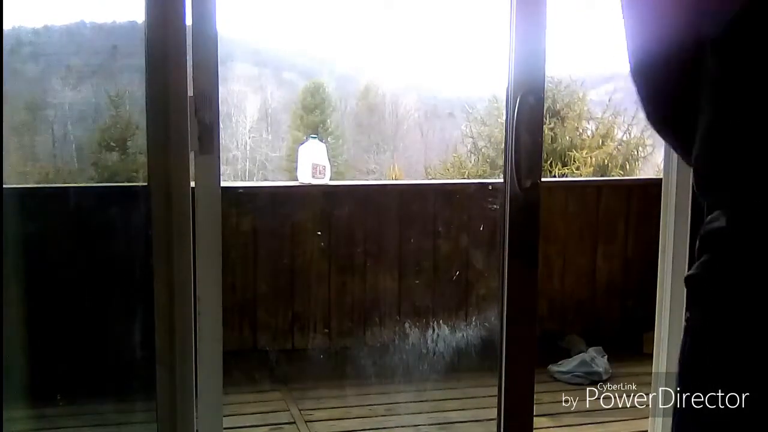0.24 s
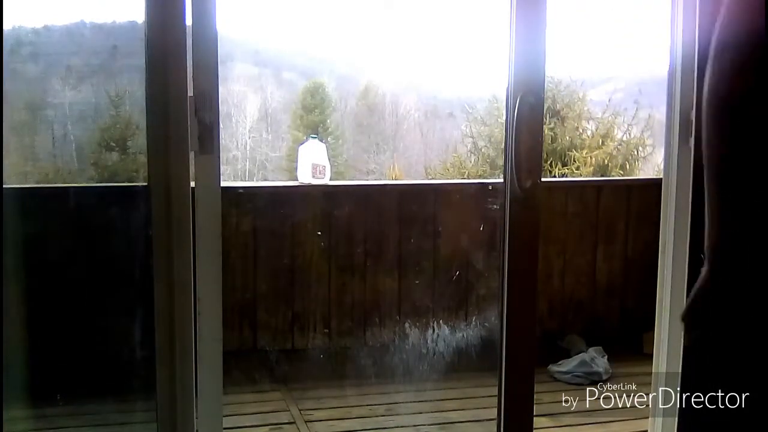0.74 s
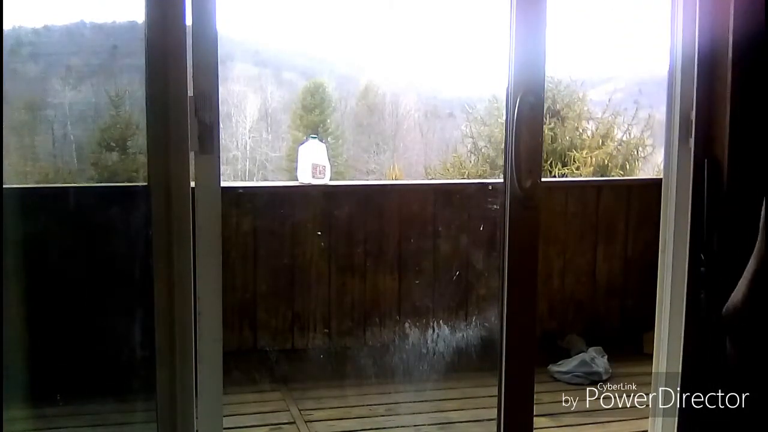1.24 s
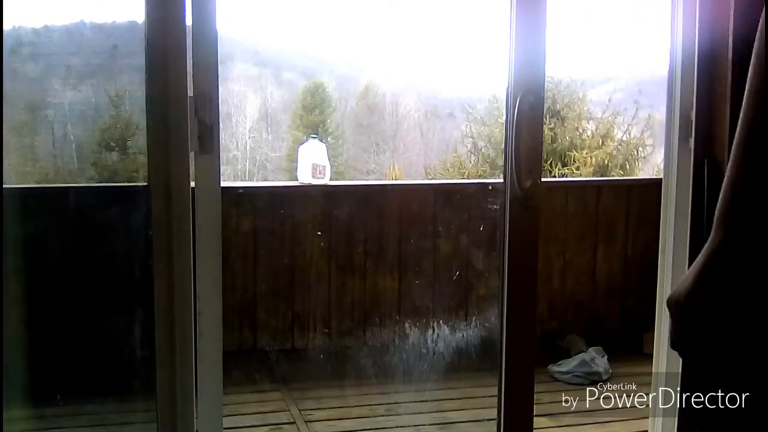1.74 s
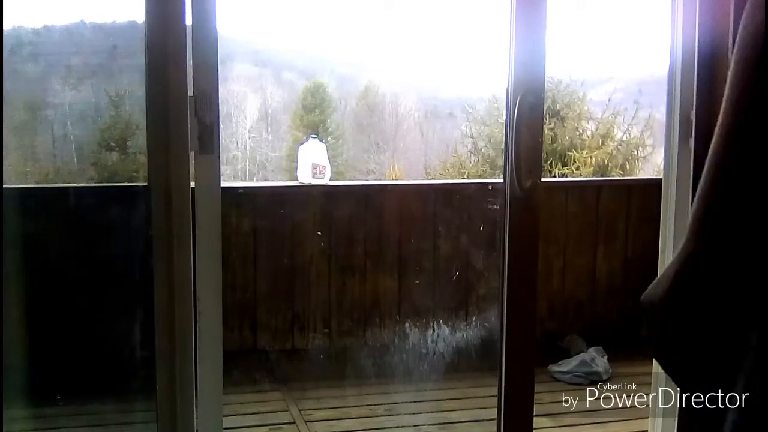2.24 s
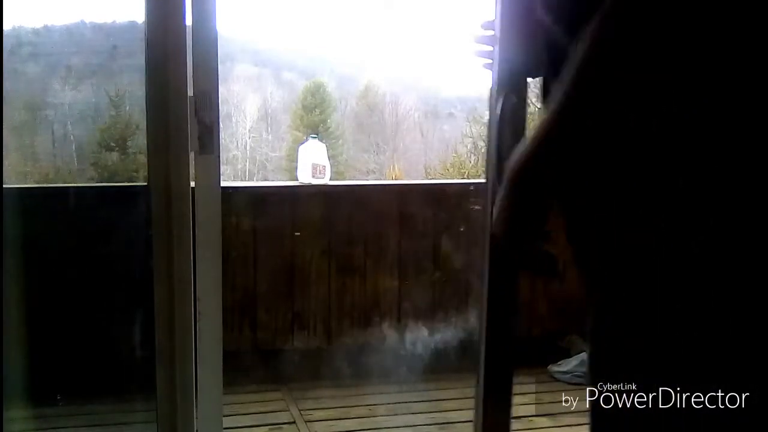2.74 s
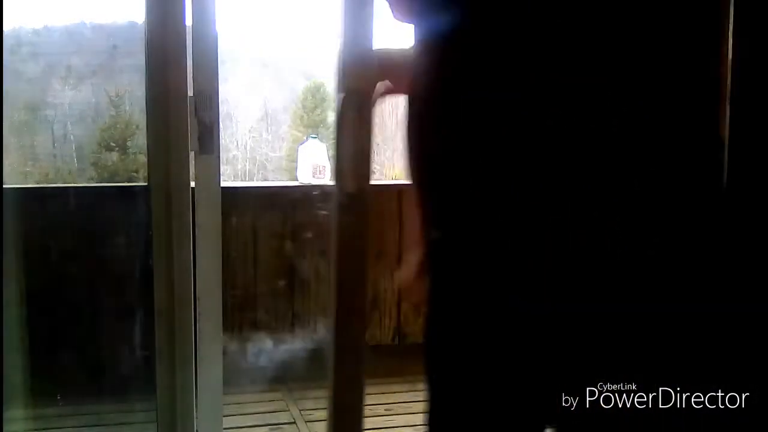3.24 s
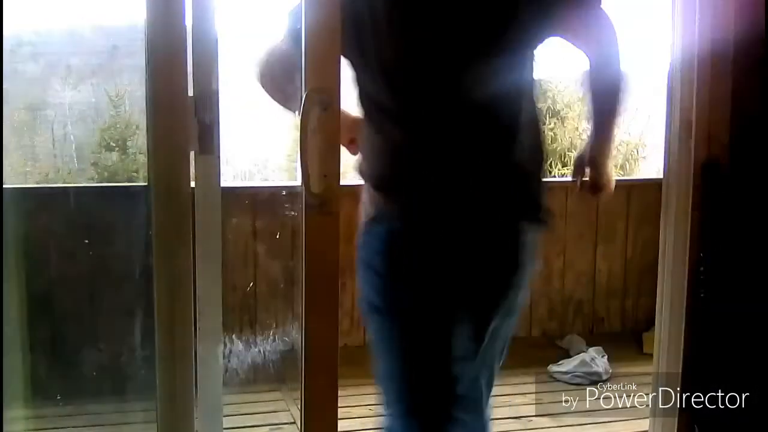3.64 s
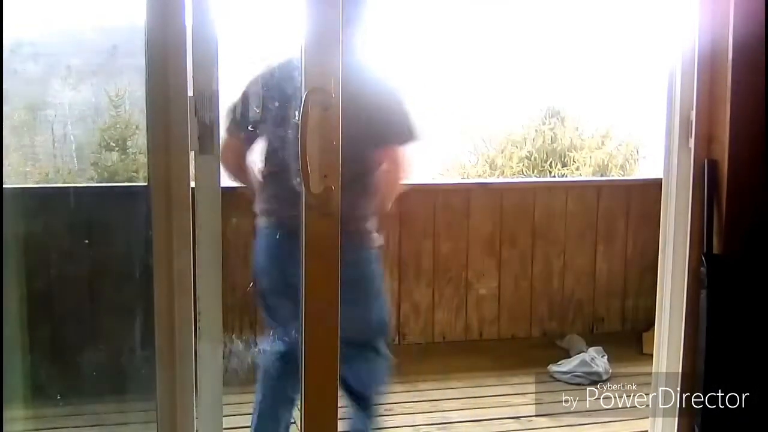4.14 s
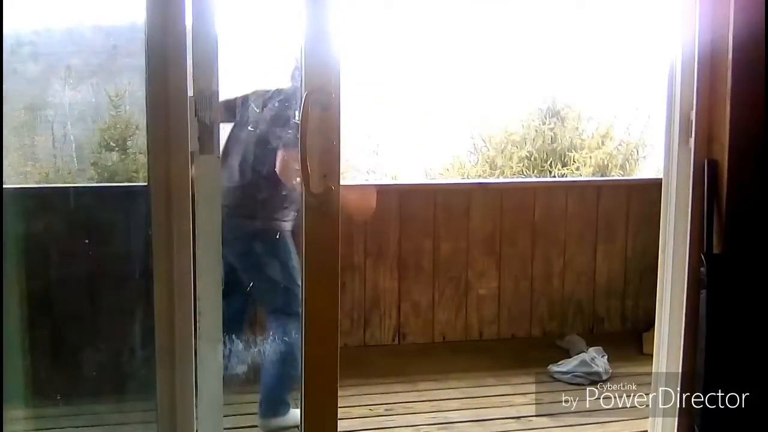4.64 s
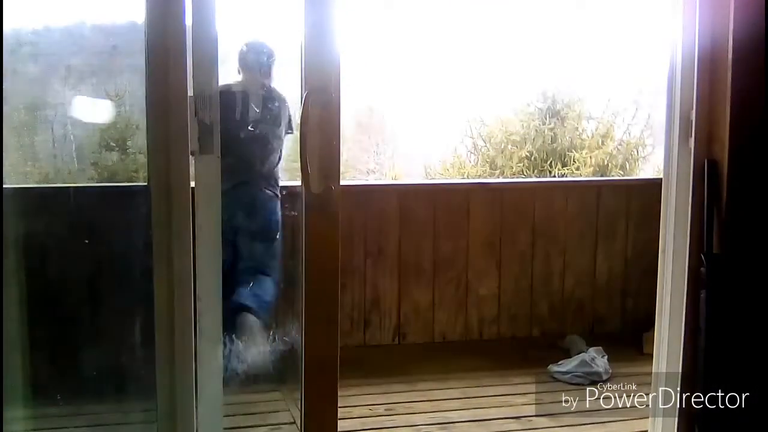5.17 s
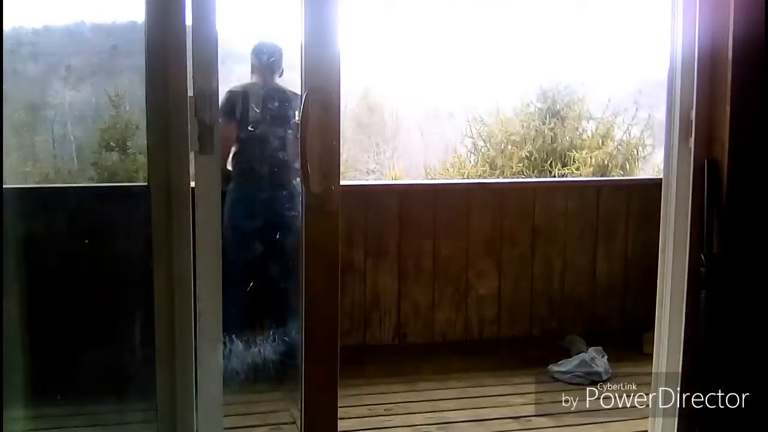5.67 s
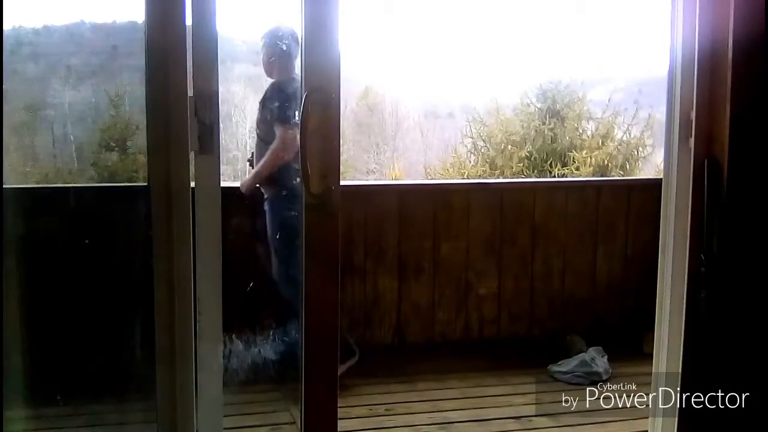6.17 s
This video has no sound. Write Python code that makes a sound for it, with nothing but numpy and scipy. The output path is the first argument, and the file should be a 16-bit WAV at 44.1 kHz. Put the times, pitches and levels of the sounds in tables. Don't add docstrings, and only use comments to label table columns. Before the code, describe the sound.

A quiet, moderately reverberant room has low air noise, a faint hum, thin high whine and hiss. A wall clock ticks softly about once a second throughout. Soles scuff a wooden floor at 0.1 s and again, longer, at 0.6 to 0.9 s; a single dull heel thump lands at 1.4 s. From 2.36 to 2.58 s a handle slips in a string of small dry clicks. At 2.75 s a latch snaps sharply with a woody frame thud, and a sliding door rumbles on gritty rollers, strongest from 3.0 to 3.3 s, fading by 3.75 s. Steps land on hollow deck boards at 3.88, 4.22, 4.49 and softly at 4.8 s, with cloth rustle, tiny metallic pings and low boom. At 5.14 s one very loud, hard knock with fast rebounds rings a glass pane, rasping the close indoor microphone. It decays under a second, leaving faint board movement and a tick at 6.06 s.

```python
import sys
import numpy as np
from scipy import signal
from scipy.fft import rfft, irfft
from scipy.io import wavfile
from scipy.ndimage import uniform_filter1d

SR = 44100
rng = np.random.default_rng(int(sys.argv[2]) if len(sys.argv) > 2 else 0)


def inscribe(sig):
    pcm = np.round(np.clip(np.atleast_2d(sig).T, -1, 1) * 32767)
    wavfile.write(sys.argv[1], SR, pcm.astype(np.int16))


def undo_db(level):
    steps = np.asarray(level, float) / 20
    return 10 ** steps


N = 282703


def evened(x):
    return x / np.sqrt(np.mean(x ** 2) + 1e-20)


def read(points, hz):
    f, value = np.transpose(points)
    return np.interp(np.log(hz + 1), np.log(f + 1), value)


def highpass(x, order, cutoff_hz):
    return signal.sosfilt(signal.butter(order, cutoff_hz, "high", fs=SR, output="sos"), x)


def colour(x, points, size=4096, even=True):
    gain_db = read(points, abs(np.fft.fftfreq(size, 1 / SR)))
    log_gain = np.log(undo_db(np.maximum(gain_db, -140)))
    taps = np.fft.ifft(np.exp(np.conj(signal.hilbert(log_gain)))).real[:size // 2]
    return signal.oaconvolve(x, taps / np.linalg.norm(taps) ** even)[:len(x)]


def resonate(x, hz, width_hz):
    r = np.exp(-np.pi * width_hz / SR)
    return 2 * signal.lfilter([1 - r], [1, -r * np.exp(2j * np.pi * hz / SR)], x).real


def ring(x, modes):
    t = np.arange(SR // 2) / SR
    response = sum(undo_db(db - 60 * t / t60) * np.sin(2 * np.pi * hz * t) for hz, db, t60 in modes)
    return signal.oaconvolve(x, response)[:N]


def blows(rows, echo_s=0., echo=0.):
    x = np.zeros(N + SR)
    for s, db in rows:
        x[round(s * SR)] += undo_db(db)
        x[round((s + echo_s) * SR)] += echo * undo_db(db)
    return x[:N]


def crunch(x, length_s):
    flurry = rfft(rng.standard_normal(2048) * np.exp(-np.arange(2048) / SR / length_s))
    return signal.oaconvolve(x, irfft(flurry / abs(flurry))[:1024])[:N]


def strokes(rows, rise_s, sag_db_per_s, lift_db_per_s):
    t, power = np.arange(N) / SR, np.zeros((2, N))
    for start_s, hold_s, level_db, *bright_db in rows:
        part = slice(round(start_s * SR), round((start_s + hold_s + .5) * SR))
        u = t[part] - start_s
        shape_db = level_db - sag_db_per_s * np.clip(u, 0, hold_s) - lift_db_per_s * np.maximum(u - hold_s, 0)
        bright = undo_db([[0], [sum(bright_db)]])
        power[:, part] += (np.clip(u / rise_s, 0, 1) * undo_db(shape_db) * bright) ** 2
    return np.sqrt(power)


def rub(gains, per_s, spread_db, points, pivot_hz):
    sizes = undo_db(spread_db * np.minimum(rng.exponential(1, N), 4))
    clicks = sizes * rng.standard_normal(N) * (rng.random(N) < per_s / SR)
    body = evened(colour(clicks, points))
    high = highpass(body, 2, pivot_hz)
    return gains[0] * (body - high) + gains[1] * high


# pitch_hz, t60_s
ROOM_DECAY = [(60, 0.39), (160, 0.75), (420, 0.54), (1100, 0.59), (2910, 0.54), (7680, 0.32)]


def room(x, wet_db, dying=0.74, build_s=0.0012, early_db=-2.0):
    hz, t, z = signal.stft(rng.standard_normal(SR), SR, nperseg=256)
    decay = undo_db(-60 * t / (dying * read(ROOM_DECAY, hz)[:, None]))
    tail = signal.istft(z * decay, SR, nperseg=256)[1][:SR]
    t = np.arange(SR) / SR
    tail *= 1 - np.exp(-t / build_s)
    tail *= 1 + undo_db(early_db) * np.exp(-t / 0.0068)
    tail *= undo_db(wet_db) / np.linalg.norm(tail)
    tail[0] = 1
    whole = rfft(tail)
    whole *= np.linalg.norm(tail) / np.sqrt(uniform_filter1d(abs(whole) ** 2, size=70))
    return signal.oaconvolve(x, irfft(whole)[:SR // 2])[:N]


# pitch_hz, level_db_per_hz
AIR_TONE = [(12, -42), (20, -12.5), (71, -8), (134, 0), (195, -4.5), (293, -4), (397, -9.5), (462, -14.5),
            (524, -12.5), (893, -15.5), (1480, -20), (1680, -20.5), (3090, -23.5), (6430, -23.5),
            (8500, -40), (11000, -65), (18700, -120)]
# pitch_hz, width_hz, level_db
DRONE = [(118.6, 8.3, -70), (232.6, 6.4, -70), (470, 29, -73.5), (1480, 28, -78.5)]


def hush():
    air = rng.standard_normal(N)
    swell_db = 0.7 * evened(uniform_filter1d(rng.standard_normal(N), 6000))
    drone = sum(undo_db(db) * evened(resonate(resonate(air[::-1], hz, w), hz, w)) for hz, w, db in DRONE)
    return undo_db(-60.5 + swell_db) * evened(colour(air, AIR_TONE)) + drone


# start_s, level_db
TICKS = [(.0635, -42), (1.0635, -41), (2.0635, -40), (3.0735, -38), (4.0645, -41), (5.064, -42),
         (6.0635, -41)]
# pitch_hz, level_db_per_hz
CASE_TONE = [(20, -39.5), (60, 2), (180, 3.5), (330, -1.5), (600, -10), (900, -18.5), (1500, -54),
             (4000, -67)]
# pitch_hz, level_db_per_hz
PAWL_TONE = [(200, -31), (500, 9), (1000, 7.5), (1600, 7), (2100, -26), (3700, -7), (5000, -35),
             (8000, -71)]


def clock():
    kicks = -undo_db(17.0) * colour(blows(TICKS, echo_s=0.01046, echo=-0.85), CASE_TONE)
    pawl = colour(blows(TICKS, echo_s=.0045, echo=.4), PAWL_TONE)
    clicks = -undo_db(5) * np.roll(pawl, round(.003 * SR))
    steel = ring(crunch(blows(TICKS), 0.0048), [(2840, -17, .012), (3000, -14.5, 0.015)])
    return room(kicks + clicks + steel, -12.0)


# start_s, hold_s, level_db, brightness_db
SCUFFS = [
    (0.0, 0.043, -56.5, -0.5),
    (0.122, 0.092, -44.5, -3),
    (0.612, 0.13, -44.5, -0.5),
    (0.69, .17, -42.5, -0.5),
    (4.49, 0.1, -57.5, -8),
]
# pitch_hz, level_db_per_hz
SOLE_TONE = [(35, -57), (60, -46), (178, -8.5), (296, -17.5), (428, -3.5), (672, -9.5), (1270, -13),
             (2250, -21.5), (3830, -21), (6790, -32.5), (8000, -45), (10400, -77), (17600, -120)]
# pitch_hz, width_hz, level_db
BOARD = [(413, 55, -2.5), (1420, 230, -10.5), (3800, 450, -8.5)]
# start_s, hold_s, level_db
RUSTLES = [(3.76, 0.047, -60.5), (3.872, 0.012, -57), (3.92, 0.11, -66), (4.2, 0.02, -64.5),
           (4.48, .06, -70)]
# pitch_hz, level_db_per_hz
CLOTH_TONE = [(530, -33), (900, 2.5), (977, -0.5), (1890, -10), (2030, -19), (2440, -6.5), (3580, -6),
              (8000, -26), (10400, -56), (17600, -120)]


def scuffs():
    drag = strokes(SCUFFS, rise_s=0.016, sag_db_per_s=15.5, lift_db_per_s=255)
    sole = rub(drag, 9000, 2.6, SOLE_TONE, 1300)
    floor = 0.55 * sole + sum(undo_db(db) * resonate(sole, hz, w) for hz, w, db in BOARD)
    brushing = strokes(RUSTLES, rise_s=0.0095, sag_db_per_s=0, lift_db_per_s=250)
    return room(floor + rub(brushing, 6000, 3.0, CLOTH_TONE, 3000), -5.5)


# start_s, level_db
HEEL = [
    (1.4035, -24.5),
    (1.4095, -24),
]
# pitch_hz, level_db_per_hz
HEEL_TONE = [(41, -43), (70, -6.5), (185, -6.5), (322, -10.5), (489, -17), (741, -20.5), (786, -22.5),
             (1340, -26), (1700, -29), (2300, -44.5), (3840, -34.5), (4500, -45.5), (6560, -48.5),
             (8000, -66), (10400, -99), (17600, -120)]
# pitch_hz, level_db, t60_s
JOISTS = [(115.5, -7, 0.29), (149, -3.5, 0.082), (171.3, 0.5, 0.079), (237, -20, 0.17), (403, -29, .15),
          (750, -24, .12)]


def heel():
    edge = room(undo_db(22) * colour(crunch(blows(HEEL[:1]), 0.0073), HEEL_TONE), 0.81, 0.93, early_db=2.0)
    joists = room(ring(uniform_filter1d(blows(HEEL), size=50), JOISTS), -7.5, 0.45)
    return highpass(edge - undo_db(1.0) * joists, 3, 65)


# start_s, level_db
SLIPS = [(2.36, -26), (2.372, -30.5), (2.382, -54), (2.399, -32.5), (2.409, -32.5), (2.419, -30.5),
         (2.467, -28), (2.498, -29), (2.505, -37), (2.517, -35), (2.533, -29.5), (2.559, -29), (2.564, -48),
         (2.575, -36.5)]
# start_s, level_db
CATCHES = [(0.1242, -37), (.617, -54), (2.0686, -39), (3.5405, -35)]
# pitch_hz, level_db_per_hz
HANDLE_TONE = [(60, -59), (120, -20.5), (240, 3), (500, 2), (840, 0), (1400, -4), (1750, -10), (2300, -21),
               (3000, -17.5), (3900, -17), (4800, -28), (6600, -26.5), (8000, -39), (11000, -96)]
# start_s, level_db
SNAPS = [
    (2.747, -33),
    (2.753, -20.5),
    (2.759, -46),
    (2.766, -44),
]
# pitch_hz, level_db_per_hz
SNAP_TONE = [(290, -21), (500, -3.5), (616, -2.5), (795, -2), (1110, -15), (1470, -9), (2370, -11),
             (3240, -15.5), (5580, -10.5), (8000, -39), (10400, -74), (17600, -120)]
# start_s, level_db
THUDS = [
    (2.747, -27),
    (2.767, -23),
    (2.797, -30.5),
]
# pitch_hz, level_db_per_hz
THUD_TONE = [(24, -44), (40, -22.5), (222, 4.5), (301, -5.5), (389, 2.5), (560, -19), (793, -17),
             (1110, -18), (1500, -26), (1950, -27), (3300, -120)]


def latch():
    slips = room(undo_db(12) * colour(crunch(blows(SLIPS + CATCHES), 0.00054), HANDLE_TONE), 0.71, 0.6, early_db=1.0)
    snap = room(undo_db(10.5) * colour(crunch(blows(SNAPS), 0.0044), SNAP_TONE), 7.6, 0.89, early_db=7)
    thud = room(undo_db(16) * colour(crunch(blows(THUDS), 0.0063), THUD_TONE), 7.5, 1.0)
    return slips + snap + thud


# start_s, level_db
ROLL = [
    (2.8, -55),
    (2.9, -46.5),
    (3.01, -35.5),
    (3.28, -35),
    (3.47, -42.5),
    (3.6, -53.5),
    (3.75, -60.5),
]
# pitch_hz, level_db_per_hz
PANEL_TONE = [(20, -40), (70, -25), (140, -6.5), (250, 1.5), (380, -4), (500, -5), (600, -5), (720, -7.5),
              (900, -13.5), (1350, -19), (2100, -31.5), (4000, -32), (5000, -45), (8000, -53), (11000, -99)]
# start_s, level_db
GRIT = [(2.9677, -35), (3.0071, -30.5), (3.1283, -38), (3.3393, -70), (3.8766, -54)]
# start_s, hold_s, level_db, brightness_db
SEAL = [
    (2.746, .006, -49, -8),
    (3.77, .06, -72, 0),
]
# pitch_hz, level_db_per_hz
SEAL_TONE = [(7000, -75), (8500, -19), (11000, -17), (12500, -11), (13800, -15), (14800, 4), (15800, -13)]


def door():
    full_speed_db, slow_shine = -41.5, 0.81
    slower_db = full_speed_db - np.interp(np.arange(N) / SR, *np.transpose(ROLL), -300, -300)
    gains = undo_db(full_speed_db - slower_db * [[1], [1 - slow_shine]])
    rolling = room(rub(gains, 3000, 2.1, PANEL_TONE, 2340), -4)
    grit = room(undo_db(4.0) * colour(crunch(blows(GRIT), 0.002), SNAP_TONE), 3.0, 0.44)
    seal = undo_db(-72 - .25 * slower_db) + strokes(SEAL, rise_s=.004, sag_db_per_s=0, lift_db_per_s=260)
    return rolling + grit + rub(seal, 20000, 1.5, SEAL_TONE, 12000)


# start_s, hold_s, level_db, brightness_db
TREADS = [(0.0, .03, -57, -13), (.064, 0.05, -50, -16), (.125, 0.15, -50, 2), (1.74, 0.024, -58, 4.5),
          (1.85, .02, -60, 8), (2.1, 0.014, -59.5, 7), (2.18, 0.018, -69, 1), (2.25, 0.018, -70, 2),
          (3.76, 0.12, -56.5, 8), (3.874, 0.12, -51, 3.5), (4.0, 0.052, -53.5, 6.5), (4.14, 0.039, -62, 5),
          (4.24, 0.17, -54.5, 4.5), (4.48, 0.12, -56.5, 6), (4.72, 0.021, -57.5, 2.5),
          (4.8, 0.13, -50, -1.5), (5.06, 0.098, -55, 4), (5.62, 0.11, -55.5, 0), (5.86, 0.017, -57, -9),
          (5.96, .05, -69, -3)]
# pitch_hz, level_db_per_hz
DECK_TONE = [(41, -14), (70, -2), (163, -2.5), (245, -1), (414, -14), (665, -16.5), (1180, -36.5),
             (1420, -24.5), (1660, -32), (2530, -41), (4000, -37), (5200, -49), (8800, -120)]
# start_s, level_db
STEPS = [
    (3.878, -27),
    (4.012, -52),
    (4.221, -34),
    (4.489, -32.5),
    (4.81, -46),
]
# start_s, level_db, pitch_hz, t60_s
PINGS = [(0.0, -41, 434, 0.068), (3.82, -63, 1355, 0.43), (4.012, -59, 1480, 0.24),
         (4.015, -64, 2600, 0.15), (4.012, -69, 3800, .1), (4.012, -64, 4530, 0.084),
         (4.075, -59, 1497, 0.33), (4.227, -40, 130, 0.11), (4.254, -46, 160, .08)]


def deck():
    t = np.arange(N) / SR
    pings = sum(undo_db(db - 60 * abs(t - s) / t60) * (t > s) * np.sin(2 * np.pi * hz * t)
                for s, db, hz, t60 in PINGS)
    weight = strokes(TREADS, rise_s=0.011, sag_db_per_s=12, lift_db_per_s=400)
    flex = rub(weight, 600, 1.1, DECK_TONE, 230)
    return flex + room(undo_db(7) * colour(blows(STEPS), DECK_TONE), 6.5, 1.0) + pings


# start_s, hold_s, level_db
BOOMS = [(2.76, .08, -51), (2.9, 0.086, -55), (3.06, .06, -58), (3.35, 0.14, -61), (3.58, 0.034, -56),
         (3.875, .21, -51.5), (4.53, 0.17, -57), (4.82, 0.19, -53.5), (5.06, .03, -57), (5.135, .05, -44)]


def boom():
    hz, width_hz = 54.8, 11
    shake = evened(resonate(resonate(rng.standard_normal(N), hz, width_hz), hz, width_hz))
    return shake * strokes(BOOMS, rise_s=0.02, sag_db_per_s=15, lift_db_per_s=202)[0]


# start_s, level_db
KNOCK = [
    (5.1355, -11),
    (5.144, -20.5),
    (5.152, -33.5),
    (5.161, -13.5),
    (5.2, -19.5),
]
# pitch_hz, level_db_per_hz
KNOCK_TONE = [(18, -68), (30, -28), (71, -18.5), (246, -18), (333, -2.5), (462, 0.5), (626, -15),
              (810, -6.5), (976, -10.5), (1750, -12), (2490, -16.5), (3970, -17), (4900, -29), (6640, -31),
              (8000, -48), (10400, -58), (17600, -120)]
# pitch_hz, level_db, t60_s
PANE = [(334, 3, 0.51), (411, 4.5, 0.35), (456.3, 1, 0.7), (687.2, 5.5, 0.43), (852, -0.5, 0.29),
        (1120, -21, 0.33), (1440, -21, 0.26), (1553, -12, 0.71), (1625, -33, 0.28), (2000, -9, 0.17),
        (2420, -24, 0.3), (2460, -18, 0.31), (2600, -12, 0.19), (2778, -28, 0.5)]


def knock():
    x = crunch(blows(KNOCK), 0.0033)
    blow = room(undo_db(14.5) * colour(x, KNOCK_TONE), 9.87, 0.77, 0.0024, early_db=3.5)
    return blow + undo_db(-19.5) * room(ring(x, PANE), -26)


def scene():
    indoors = hush() + clock() + scuffs() + heel()
    way_out = latch() + door() + deck() + boom()
    return (indoors + way_out + knock())[None]


# pitch_hz, level_db
RASP_TONE = [(7000, -64), (8000, -28), (10000, -12), (13000, -14), (15000, 0), (15800, -32)]


def rasp(x):
    load = uniform_filter1d(abs(highpass(x, 2, 350)), size=60)
    return colour(load ** 1.77 * rng.standard_normal(N), RASP_TONE, even=False)


# pitch_hz, level_db
HISS_TONE = [(7000, -130), (8000, -90.5), (11000, -87.5), (14000, -86.5), (15000, -72), (15800, -101)]
# pitch_hz, level_db
WHINE = (12695.4, -70.5)


def electronics():
    hiss = undo_db(12) * colour(rng.standard_normal(N), HISS_TONE, even=False)
    hz, level_db = WHINE
    return hiss + undo_db(level_db) * np.sqrt(2) * np.sin(2 * np.pi * hz * np.arange(N) / SR)


def roll_off(x):
    return signal.sosfilt(signal.butter(12, 16800, fs=SR, output="sos"), x)


def record(dry):
    heard = dry + rasp(dry[0]) + electronics()
    edge = signal.firwin(511, 15600, window=("kaiser", 9), fs=SR)[None]
    return roll_off(signal.oaconvolve(heard, edge, "same"))


dry = scene()
out = record(dry)
inscribe(out)
```